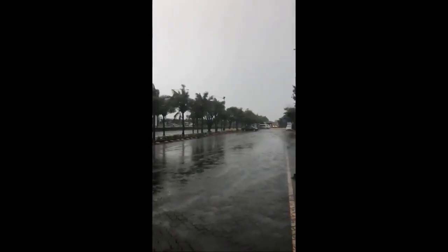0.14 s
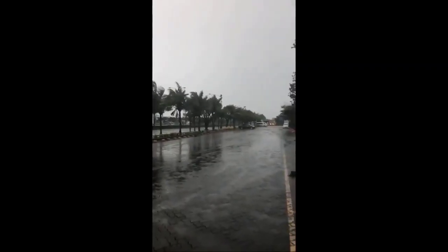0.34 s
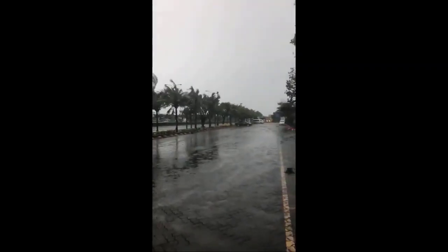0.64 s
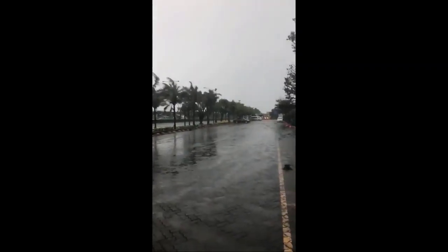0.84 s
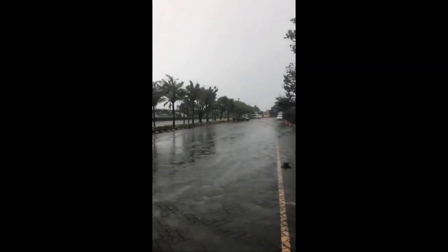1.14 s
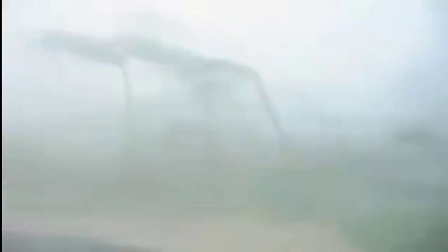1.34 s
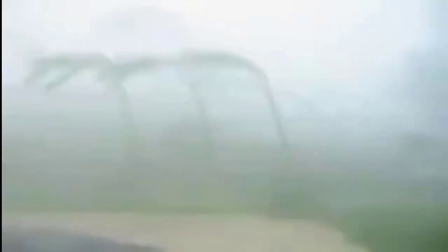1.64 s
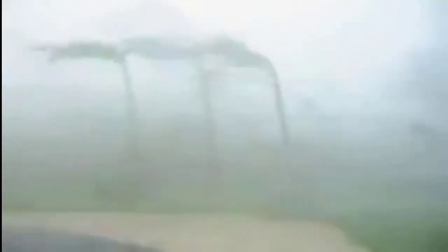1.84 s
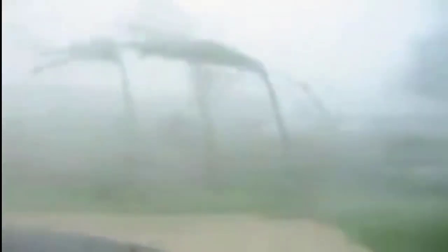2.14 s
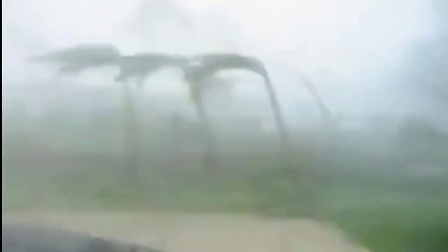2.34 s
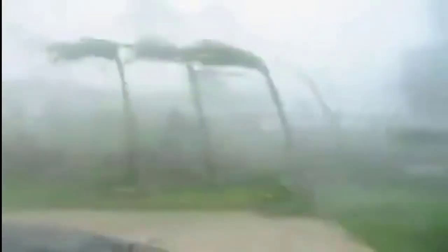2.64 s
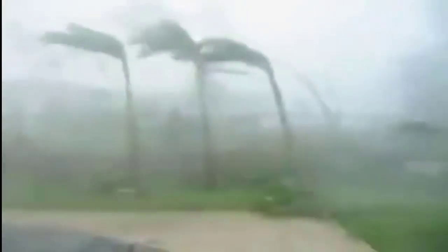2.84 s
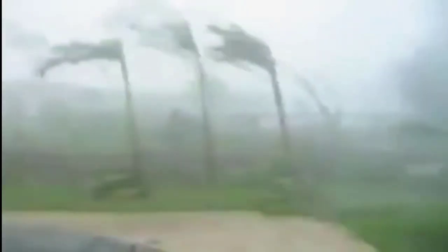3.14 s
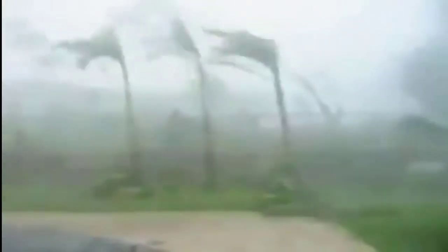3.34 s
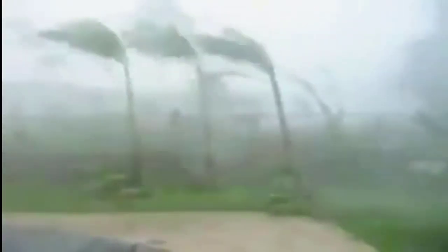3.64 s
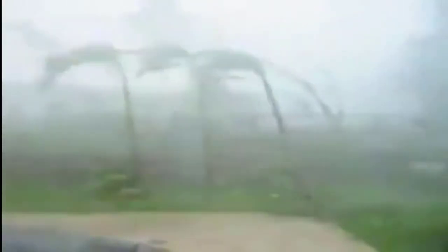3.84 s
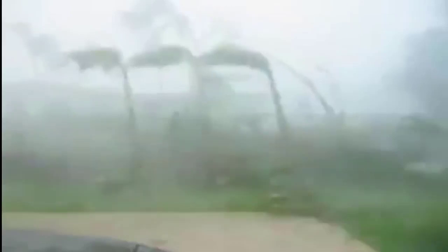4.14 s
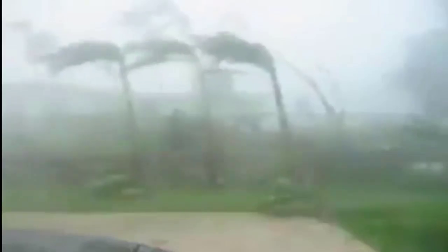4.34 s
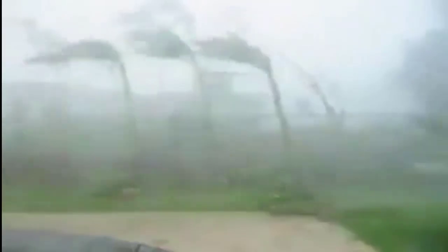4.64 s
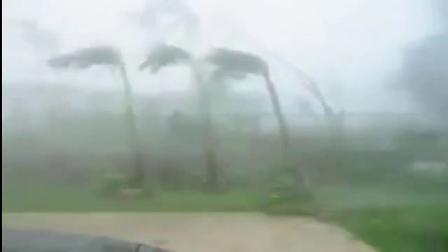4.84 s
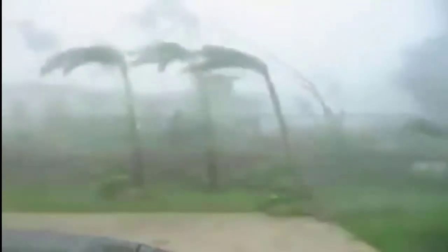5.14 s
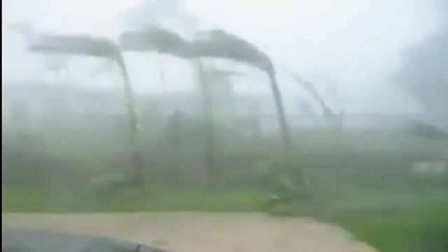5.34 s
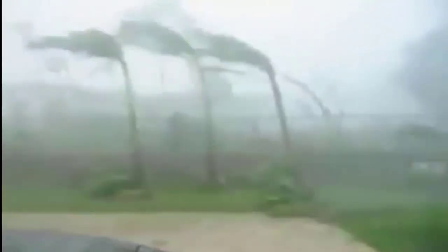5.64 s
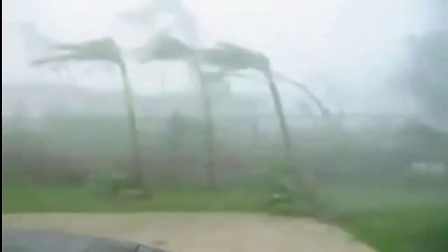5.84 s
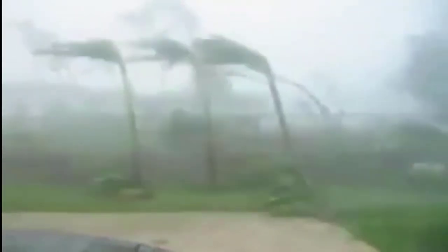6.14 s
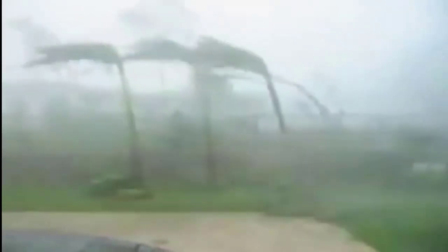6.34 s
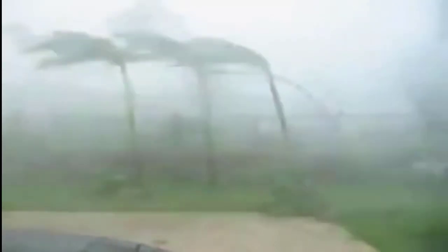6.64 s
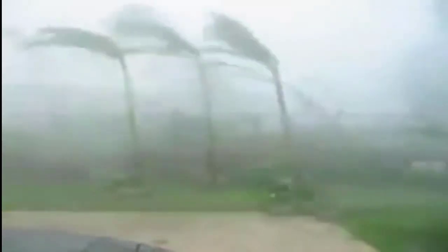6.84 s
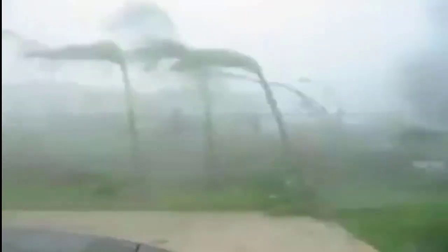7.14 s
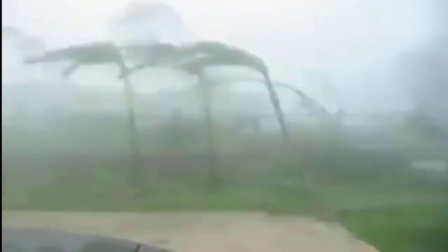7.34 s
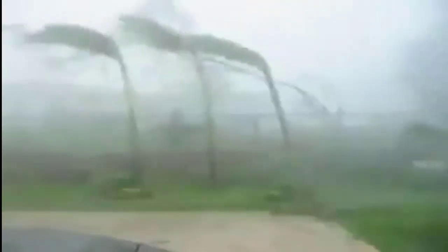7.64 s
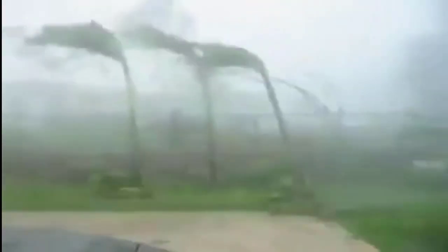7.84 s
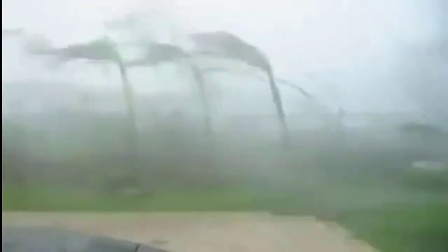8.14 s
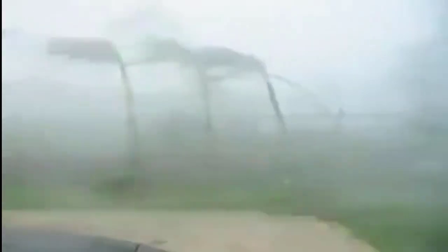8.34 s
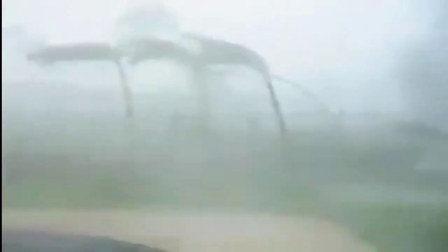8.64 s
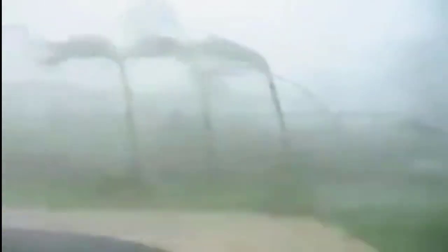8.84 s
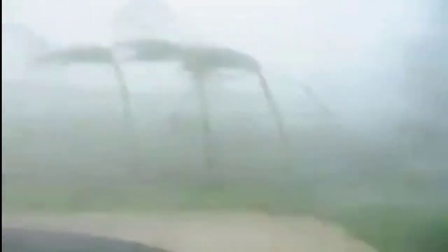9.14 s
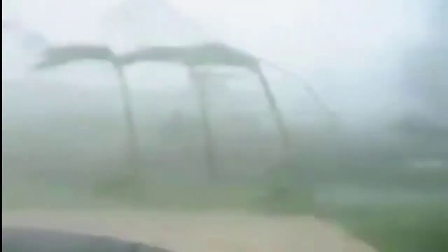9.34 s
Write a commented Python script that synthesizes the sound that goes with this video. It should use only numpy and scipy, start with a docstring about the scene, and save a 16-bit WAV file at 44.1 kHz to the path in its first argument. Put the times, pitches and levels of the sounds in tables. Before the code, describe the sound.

First come close, lumpy wind bursts and low thumps on an unprotected microphone outdoors, with smooth road-water hiss rising underneath. A hard cut brings a much fuller storm heard inside a shaking shelter: continuous deep rumble, fluttering wind roar, a breathy low moan mostly early on, and dense rain drumming and hissing in quick surges to the end. The sound is dull on top, compressed and faintly fizzy.

```python
"""A typhoon heard from two places. First a wet roadside: gusts buffet and pop on a bare microphone, which is
noise shaped into bursts, with low sagging thuds, over a hiss of filtered noise that draws near.
Then, at a stroke, the inside of a sheltered cabin: resonant noise booms, slow noise sways, wind roars in
shaped noise and moans in wavering tones, and flickering noise lashes the walls as sheets of rain.
There an overdriven narrow-band microphone with a steady offset fizzes faintly and is held down by a limiter."""
import sys
import numpy as np
from scipy import signal
from scipy.fft import rfft, irfft
from scipy.io import wavfile
from scipy.ndimage import uniform_filter1d, minimum_filter1d

SR = 44100
rng = np.random.default_rng(int(sys.argv[2]) if len(sys.argv) > 2 else 0)


def dump(signal):
    """Clip the signal to [-1, 1] and save it as 16-bit WAV at the path in sys.argv[1]."""
    limited = np.clip(np.atleast_2d(signal).T, -1, 1)
    pcm = np.round(limited * 32767).astype(np.int16)
    wavfile.write(sys.argv[1], SR, pcm)


N = 418950
TIME_S = np.arange(N) / SR


def amp(db):
    """Decibels to a plain factor."""
    return 10 ** (np.asarray(db) / 20)


def rms_one(x):
    """Scales a signal to an rms of 1."""
    return x / np.sqrt(np.mean(x ** 2) + 1e-20)


def filtered(x, order, hz, kind):
    """Lets through only what is above, or between, the given frequencies."""
    return signal.sosfilt(signal.butter(order, hz, kind, fs=SR, output="sos"), x)


def in_time(rows):
    """Straight lines between the rows of a time table: one curve a column, one value a sample."""
    seconds, *columns = np.transpose(rows)
    return [np.interp(TIME_S, seconds, column) for column in columns]


def drift(rate):
    """Slow chance of spread 1 that changes about rate times a second."""
    # smoothed noise is made at a twentieth of the sample rate; its first part, still settling, is dropped
    r = np.exp(-40 * np.pi * rate / SR)
    noise = rng.standard_normal(N // 20 + 4002)
    slow = signal.lfilter([1], [1, -2 * r, r * r], noise)[4000:]
    return np.interp(np.arange(N) / 20, np.arange(len(slow)), rms_one(slow))


def coloured(x, colour):
    """Shapes a signal by a (f/Hz, level/dB per Hz) table, steeply closed outside it; rms 1."""
    hz, db = np.transpose(colour)
    grid = np.maximum(np.fft.rfftfreq(N, 1 / SR), 1)
    octaves_outside = np.log2(np.maximum(grid / hz[-1], 1) * np.maximum(hz[0] / grid, 1))
    gain_db = np.interp(np.log(grid), np.log(hz), db) - 30 * octaves_outside
    return rms_one(irfft(rfft(x) * amp(gain_db), N))


def patchy(together, own_db, rate):
    """White noise whose octave bands share one flicker (dB) and add one of their own."""
    out, edges = 0, 20 * 2 ** np.arange(11)
    spectrum, grid = rfft(rng.standard_normal(N)), np.fft.rfftfreq(N, 1 / SR)
    for low, high in zip(edges, edges[1:]):
        octave = irfft(spectrum * ((grid >= low) & (grid < high)), N)
        out = out + amp(together + own_db * drift(rate)) * octave
    return out


def resonant_noise(hz, width_hz):
    """Noise rings twice through one resonance; rms 1."""
    r = np.exp(-np.pi * width_hz / SR)
    stage = [1, 0, -1, 1, -2 * r * np.cos(2 * np.pi * hz / SR), r * r]
    # the first second, while the ringing builds up, is dropped
    return rms_one(signal.sosfilt([stage, stage], rng.standard_normal(N + SR))[SR:])


def evened(x, evenness):
    """A steadily driven sound swells less than free noise; rms 1."""
    envelope = np.abs(signal.hilbert(x))
    return rms_one(x / (envelope + 0.051) ** evenness)


def swell(peak_s, length, lean=0):
    """A bell-shaped rise and fall of height 1, one value a millisecond; length (s) is its width at half height."""
    t = np.arange(N * 1000 // SR + 1) / 1000 - peak_s
    side_length = max(length, .01) * (1 - np.clip(lean, -.8, .8) * np.sign(t))
    return 2.0 ** -(2 * t / side_length) ** 2


def to_samples(per_ms):
    """One value a millisecond to one a sample."""
    return np.interp(TIME_S * 1000, np.arange(len(per_ms)), per_ms)


def swells_db(rows, lean=0, axis=1):
    """Decibels gained over time from (peak t/s, level/dB, length/s) rows; axis picks another dB column."""
    return to_samples(sum(row[axis] * swell(row[0], row[2], lean) for row in rows))


# Roadside hiss over time: (t/s, level/dB, further level/dB above 4 kHz)
HISS_LEVELS = [(0.0, -58, 0), (0.12, -56, -8), (0.24, -54.5, 0), (0.36, -55.5, -5), (0.48, -54.5, -4),
               (0.75, -51.5, -1.5), (1.052, -48.5, -4), (1.39, -47, -3)]
# Tone of the wet road: (f/Hz, level/dB per Hz)
HISS_COLOUR = [(400, -15.5), (700, -5.5), (1000, -6.5), (1400, -3.5), (1800, -6), (2400, -17),
               (3500, -25.5), (4300, -32.5), (5600, -32), (7800, -41), (9400, -39), (11800, -43),
               (13500, -43), (15000, -45)]


def wet_hiss():
    """Water on the road makes a smooth far hiss that grows as it nears, while its treble wavers."""
    level_db, treble_db = in_time(HISS_LEVELS)
    hiss = coloured(patchy(0.34 * drift(5.6), 0.28, 19), HISS_COLOUR)
    treble = filtered(hiss, 3, 4000, "high")
    return amp(level_db) * (hiss + (amp(treble_db) - 1) * treble)


# Low thuds of air on the microphone port: (middle t/s, peak level/dB, middle f/Hz, length/s)
THUD_TABLE = [(0.169, -39, 264, 0.01), (0.187, -24, 247, 0.01), (0.219, -34, 149, 0.011),
              (0.571, -25, 186, 0.011), (0.586, -17, 139, 0.0097), (0.657, -40, 165, 0.018),
              (0.826, -31, 140, 0.011), (0.845, -35, 135, 0.018), (0.886, -30.5, 167, 0.028),
              (0.959, -37, 79.5, 0.023), (0.02, -31, 130, 0.01), (1.109, -29, 229, 0.011),
              (1.134, -34, 110, 0.03), (1.153, -30.5, 100, 0.0085), (1.21, -33, 227, 0.0097),
              (1.236, -34, 160, 0.011), (1.253, -29, 150, 0.0075), (1.267, -27, 95, 0.012)]
THUD_SAG = 0.32   # share of its middle pitch that a thud loses over its length


def thuds():
    """Air thumps the port: each thud is a brief low swing that sags in pitch."""
    out = np.zeros(N)
    starts = rng.uniform(0, 2 * np.pi, len(THUD_TABLE))
    for (s, db, hz, length), start in zip(THUD_TABLE, starts):
        near = np.arange(max(round((s - .05) * SR), 0), round((s + .05) * SR))
        t = near / SR - s
        turns = hz * t * (1 - .5 * THUD_SAG * t / length)
        out[near] += amp(db) * 2.0 ** -(2 * t / length) ** 2 * np.sin(start + 2 * np.pi * turns)
    return out


# Eddies popping on the port: (start t/s, burst peak level/dB, top f/Hz of the burst, crack level/dB beside it)
POP_TABLE = [(0.008, -35, 1530, -20), (0.022, -34, 1300, -27), (0.042, -32, 1610, -21),
             (0.055, -29, 1600, -32), (0.065, -29, 1400, -31), (0.09, -45, 1500, -28),
             (0.109, -41, 1200, -30), (0.130, -32, 1090, -28), (0.159, -26.5, 1690, -32),
             (0.163, -24.5, 1070, -29), (0.1835, -13.5, 1740, -29.5), (0.187, -19, 1210, -28),
             (0.199, -44, 1200, -34), (0.211, -34, 1200, -30), (0.353, -40, 1000, -34),
             (0.412, -45, 1800, -22), (0.500, -42, 1800, -18), (0.529, -49, 900, -30),
             (0.567, -29, 990, -29), (0.580, -34, 1200, -28), (0.597, -35.5, 1100, -33),
             (0.627, -38, 1800, -21), (0.816, -37, 1000, -34), (0.872, -39, 800, -32),
             (1.056, -44, 1800, -15), (1.205, -41, 900, -34)]
POP_S, POP_SNAP = 0.0054, 2.9   # fade time; how far the first push stands above the rest
CRACK_LOW_HZ, CRACK_HIGH_HZ = 4200, 7950
CRACK_RISE_S, CRACK_S = 0.0012, 0.0061   # the crack swells later than the burst
OVERTONE_DB, OVERTONE_LOW_HZ, OVERTONE_HIGH_HZ = 7, 2420, 3200   # a narrow band of the crack


def pops():
    """An eddy bursts on the port: a short burst of dull noise with a faint crack on it."""
    out, t = np.zeros(N), np.arange(SR // 20) / SR
    fade = np.minimum(t / 0.00076, 1) * np.exp(-(t / POP_S) ** 2 * 2)
    first_push = 1 + POP_SNAP * np.exp(-(t / 0.0009 - 1) ** 2 * 4)
    crack_fade = np.minimum(t / CRACK_RISE_S, 1) * np.exp(-(t / CRACK_S) ** 2 * 2)
    noises = rng.standard_normal((len(POP_TABLE), len(t)))
    for (s, db, top_hz, crack_db), noise in zip(POP_TABLE, noises):
        dull = signal.cheby1(5, .5, [380, top_hz], "band", fs=SR, output="sos")
        burst = signal.sosfilt(dull, first_push * fade * np.sign(noise))
        overtone = filtered(noise, 2, [OVERTONE_LOW_HZ, OVERTONE_HIGH_HZ], "band")
        crack = filtered(noise, 1, [CRACK_LOW_HZ, CRACK_HIGH_HZ], "band") + amp(OVERTONE_DB) * overtone
        pop = burst / np.abs(burst).max() + amp(crack_db) * crack_fade * crack
        out[round(s * SR):][:len(t)] += amp(db) * pop
    return out


# Gusts on the port: (middle t/s, length/s, body level/dB, sharp edges level/dB)
GUST_TABLE = [(-0, 0.043, -29, -31), (0.041, 0.017, -40, -33), (0.07, 0.029, -29.5, -32.5),
              (0.089, 0.019, -36, -42), (0.127, 0.031, -28, -37.5), (0.166, 0.014, -24, -36),
              (0.191, 0.013, -33, -33), (0.213, 0.023, -27.5, -34.5), (0.258, 0.039, -35, -45),
              (0.315, 0.03, -41, -54), (0.361, 0.032, -37.5, -47), (0.43, 0.08, -45, -61),
              (0.508, 0.027, -49, -62), (0.541, 0.047, -39, -50), (0.587, 0.043, -31.5, -43.5),
              (0.653, 0.046, -37, -61), (0.7, 0.04, -46, -61), (0.762, 0.059, -37, -54),
              (0.835, 0.043, -33.5, -58), (0.891, 0.033, -42, -41.5), (0.934, 0.027, -42, -47),
              (1.024, 0.05, -45, -53), (1.073, 0.04, -40.5, -45), (1.137, 0.037, -40, -49),
              (1.235, 0.026, -42, -46), (1.293, 0.051, -46, -51), (1.345, 0.042, -42, -59),
              (1.397, 0.043, -46, -51)]
# Tone of the dull body: (f/Hz, level/dB per Hz)
BODY_COLOUR = [(30, -2), (55, 3.5), (120, 0), (200, -4), (270, -5.5), (340, -16), (600, -35)]
# Tone of the sharp edges: (f/Hz, level/dB per Hz)
SHARP_COLOUR = [(150, -13), (350, 1), (600, -4.5), (1000, -18), (1600, -27), (2500, -58)]
# Tone of the thin treble riding on the edges: (f/Hz, level/dB per Hz)
GUST_TREBLE_COLOUR = [(2500, -1), (4500, 3), (7500, -8), (12000, -8), (15000, -9)]
GUST_TREBLE_DB = -34   # beside the edges
LULL_DB, LULL_EDGES_DB = -50, -73   # body and edges between the gusts
GUST_LEAN = -0.3   # a gust strikes at once and trails off
BUFFET_EVENNESS = 0.1


def gust_gain(column, lull_db):
    """Adds up the gusts over a quiet floor, from one level column of the gust table."""
    gain = amp(lull_db)
    for row in GUST_TABLE:
        middle_s, length = row[:2]
        peak_s = middle_s + GUST_LEAN * length / 2
        gain = gain + amp(row[column]) * swell(peak_s, length, GUST_LEAN)
    return to_samples(gain)


def buffeting():
    """Eddies hit the port in lumps; their sharp edges come as separate grains within the lumps."""
    lumps = drift(59)
    body = evened(coloured(patchy(1.5 * lumps, 0.77, 8.9), BODY_COLOUR), BUFFET_EVENNESS)
    body = filtered(body, 3, [45, 330], "band")   # the port passes little above or below
    edges = coloured(patchy(2.0 * lumps + 2.4 * drift(84), 0.51, 40), SHARP_COLOUR)
    treble = coloured(patchy(2.0 * lumps, 1.5, 60), GUST_TREBLE_COLOUR)
    edges = edges + amp(GUST_TREBLE_DB) * treble
    return gust_gain(2, LULL_DB) * body + gust_gain(3, LULL_EDGES_DB) * edges


# Tone of the slow pressure swings in the cabin: (f/Hz, level/dB per Hz)
SWAY_TONE = [(1, 8), (4, -20), (10, 18), (17, 0), (24, 0), (32, 5)]


def sway():
    """The cabin air sways in slow pressure swings, mostly too low to hear."""
    return amp(-30) * coloured(rng.standard_normal(N), SWAY_TONE)


# Notes of the moan: (middle t/s, level/dB, length/s, f/Hz)
MOAN_NOTES = [(2.117, -52, 0.092, 232.4), (2.27, -45.5, 0.25, 250), (2.2, -50, 0.08, 312),
              (2.365, -41, 0.081, 305), (2.516, -38.5, 0.074, 281), (2.672, -46, 0.21, 283.5),
              (2.844, -37.5, 0.11, 282), (3, -37, 0.11, 281), (3.137, -39.5, 0.054, 293),
              (3.204, -42.5, 0.08, 303), (3.327, -48, 0.12, 278), (3.568, -43, 0.11, 290),
              (4.615, -40, 0.087, 284), (5.799, -53.5, 0.67, 283), (6.75, -44.5, 0.21, 320)]
MOAN_WANDER_HZ, MOAN_BREATH = 5.5, 0.22   # spread of the pitch; share of breathy noise
PANEL_HZ, PANEL_WIDTH_HZ, PANEL_DB = 250, 19, -53.5   # a panel that keeps humming


def moan():
    """Wind over gaps sings unsteady, breathy notes that may overlap; a panel hums below them."""
    wander = 2 * np.pi * np.cumsum(MOAN_WANDER_HZ * drift(19.5)) / SR
    breath = 1 + MOAN_BREATH * (drift(32) + 1j * drift(30))
    breath = np.sqrt(2) * amp(2.0 * drift(29.0)) * breath   # the root turns rms levels into peaks
    out = amp(PANEL_DB) * resonant_noise(PANEL_HZ, PANEL_WIDTH_HZ)
    for s, db, length, hz in MOAN_NOTES:
        near = slice(int((s - 1.5 * length) * SR), int((s + 1.5 * length) * SR))
        t = TIME_S[near]
        note = np.real(breath[near] * np.exp(1j * (2 * np.pi * hz * t + wander[near])))
        out[near] += amp(db) * 2.0 ** -(2 * (t - s) / length) ** 2 * note
    return out


# Boom and roar over time: (t/s, boom level/dB, roar level/dB)
STORM_LEVELS = [(1.42, -26, -37), (1.47, -35, -39), (1.55, -27, -37.5), (1.85, -29, -37),
                (2.05, -23.5, -43.5), (2.3, -29.5, -36.5), (2.45, -25, -40.5), (2.85, -29.5, -37),
                (3.05, -24.5, -39.5), (3.18, -28, -37.5), (3.75, -30.5, -38), (4.3, -27.5, -35.5),
                (4.47, -31, -39.5), (4.65, -29, -40.5), (5.25, -24.5, -36), (5.43, -34, -37.5),
                (5.58, -26.5, -39), (5.72, -31, -42.5), (5.9, -26.5, -37), (6.65, -28.5, -40),
                (7.1, -24.5, -38), (7.5, -27, -42), (7.8, -29.5, -36), (7.9, -29.5, -40),
                (8.15, -25, -37.5), (8.55, -31.5, -40.5), (8.7, -26.5, -38.5), (8.9, -26, -43.5),
                (9.2, -31.5, -35), (9.4, -24.5, -38.5), (9.5, -28.5, -40)]
BOOM_HZ, BOOM_WIDTH_HZ, BOOM_EVENNESS = 38.8, 26.6, 0.57
CORE_HZ, CORE_WIDTH_HZ, CORE_DB = 42, 6.6, -2.7   # the sharper heart of the boom, level beside the rest


def boom(eddies):
    """Gusts shake the cabin, and its air booms at a low resonance."""
    boom_db = in_time(STORM_LEVELS)[0]
    core = amp(CORE_DB) * resonant_noise(CORE_HZ, CORE_WIDTH_HZ)
    air = evened(resonant_noise(BOOM_HZ, BOOM_WIDTH_HZ) + core, BOOM_EVENNESS)
    return amp(boom_db + 0.68 * drift(7.1) + 0.85 * eddies) * air


# Surges of the roar: (peak t/s, gained level/dB, length/s)
ROAR_SURGES = [(1.758, 1.5, 0.072), (2.362, 3, 0.097), (3.281, 0, 0.13), (5.171, 1.5, 0.11),
               (5.763, 7.5, 0.27), (6.869, 5.5, 0.07), (7.073, 5, 0.066), (7.38, 8.5, 0.097),
               (7.704, -0.5, 0.083), (8.382, 4, 0.061), (8.54, 6.5, 0.045), (8.834, 4, 0.089),
               (9.046, 5, 0.058)]
# Tone of the roar: (f/Hz, level/dB per Hz)
ROAR_TONE = [(18, -33), (60, -4.5), (72, -6), (83, -0.5), (95, -7.5), (104, -5.5), (118, -4.5), (150, -1),
             (180, -4), (230, -10.5), (300, -9), (420, -17.5), (800, -20), (1500, -37)]
# The roar's lowest part over time: (t/s, level/dB added below LOW_ROAR_HZ)
LOW_ROAR_LEVELS = [(1.42, 0.5), (1.9, -2.5), (2.3, 5), (2.8, -2), (3.3, 1.5), (3.8, 2.5), (4.3, 4),
                   (4.7, 5.5), (5.1, 0), (5.6, -1.5), (6.1, 0), (6.6, -1), (7.1, -1), (7.6, 1), (8.2, 1.5),
                   (8.7, -3), (9.1, 6), (9.5, -2.5)]
LOW_ROAR_HZ = 129
ROAR_FOLLOWS = 0.42   # dB of roar gained per dB of rain


def roar(more_rain_db, eddies):
    """Turbulent wind roars as flickering low noise that grows with the rain."""
    roar_db = in_time(STORM_LEVELS)[1] + ROAR_FOLLOWS * more_rain_db + swells_db(ROAR_SURGES)
    wind = amp(roar_db) * coloured(patchy(1.02 * drift(27) + 1.26 * eddies, 0.5, 6.8), ROAR_TONE)
    low = signal.sosfiltfilt(signal.butter(2, LOW_ROAR_HZ, fs=SR, output="sos"), wind)
    return wind + (amp(in_time(LOW_ROAR_LEVELS)[0]) - 1) * low


# Rain between the lashes: (t/s, hiss level/dB, level/dB added to the drumming, level/dB added to the top octave)
RAIN_LEVELS = [(1.42, -47.5, -2.5, -1.5), (2.25, -50.5, 1.5, -4.5), (3.22, -46, 0.5, 0.5),
               (3.58, -44.5, 1.5, 0.5), (4.01, -48, -2.5, 1), (4.28, -48, 1.5, 0.5), (4.61, -45, 2, 1.5),
               (5.51, -40.5, 1.5, 1), (5.74, -49.5, 1, -0.5), (5.96, -44, -2.5, 1), (6.19, -39, 2, 2),
               (6.48, -45.5, -1.5, 2.5), (6.82, -43.5, 4.5, 2), (7.04, -47.5, -1, -1),
               (7.27, -49.5, 0.5, -4.5), (7.79, -48, 1.5, 2.5), (8.28, -40.5, -0.5, 1), (8.42, -43, -1, 3),
               (9.27, -44, 1.5, 1), (9.5, -42.5, -3, 0)]
# Brief lulls of the rain: (peak t/s, gained level/dB, length/s)
RAIN_LULLS = [(1.624, -5.5, 0.049), (2.032, -1.5, 0.075), (2.588, -2.5, 0.028), (3.127, -4, 0.14),
              (3.833, -6, 0.043), (4.204, -2, 0.067), (4.581, -4, 0.035), (5.115, -2, 0.33),
              (6.193, -6.5, 0.064), (6.47, -1, 0.027), (6.616, -3.5, 0.021), (7.161, -3.5, 0.059),
              (8.192, -7, 0.1), (8.48, -2, 0.03), (8.57, -3, 0.044), (8.799, -5.5, 0.043),
              (9.242, -6.5, 0.038)]
# Sheets of rain lashing the walls: (peak t/s, gained hiss level/dB, length/s, gained drumming level/dB)
RAIN_LASHES = [(1.45,6,0.035,11.5), (1.665,4.5,0.041,5), (1.751,2,0.039,3.5), (1.842,-4,0.021,-6),
               (1.919,6,0.031,9), (2.334,5,0.31,4.5), (2.524,5.5,0.052,2.5), (2.835,4,0.055,3),
               (2.946,1.5,0.019,3), (3.21,2,0.022,9), (3.275,-5,0.033,2), (3.47,1.5,0.02,3),
               (3.741,3,0.11,2.5), (3.932,1,0.15,4), (4.106,1.5,0.031,9), (4.487,8,0.062,3.5),
               (4.794,2,0.068,4), (4.918,1.5,0.051,6), (5.24,2,0.041,5), (5.358,2,0.036,2),
               (5.476,1,0.074,3), (5.735,4,0.047,7), (6.12,1.5,0.033,3), (6.42,5,0.065,5.5),
               (6.756,7,0.054,4), (6.866,3.5,0.078,-3.5), (6.93,-1.5,0.04,-2.5), (6.984,3,0.039,4),
               (7.509,6,0.044,7), (7.604,5,0.018,4), (7.81,5.5,0.21,2), (8.36,2.5,0.033,3),
               (8.428,7,0.078,4), (8.53,3,0.048,0.5), (8.863,6,0.1,3), (8.98,4.5,0.047,4.5),
               (9.379,4,0.045,3), (9.453,3,0.028,2)]
LASH_LEAN = 0.17   # a lash builds slowly and stops short: share of its length moved from the fall to the rise
MIDDLING_RAIN_DB = -47.5
DRUM_FOLLOWS = 0.67   # dB of drumming gained per dB of rain, before the lashes


def rain_levels():
    """Wind drives the rain in sheets: how far it is above middling rain, and what drumming and top gain (dB)."""
    rain_db, drum_db, top_db = in_time(RAIN_LEVELS)
    more_db = rain_db + swells_db(RAIN_LULLS) - MIDDLING_RAIN_DB
    drum_db = drum_db + DRUM_FOLLOWS * more_db + swells_db(RAIN_LASHES, LASH_LEAN, axis=3)
    return more_db + swells_db(RAIN_LASHES, LASH_LEAN), drum_db, top_db


# Tone of the rain's hiss: (f/Hz, level/dB per Hz)
RAIN_TONE = [(600, -19), (1100, -9.5), (1500, 1.5), (2150, 2.5), (2700, -3), (3190, -4.5), (3600, -11)]
# Tone of the drumming walls: (f/Hz, level/dB per Hz)
DRUM_TONE = [(300, -4), (450, -4.5), (750, -1.5), (1000, -5.5), (1300, -8)]
# Tone of the top octave of the rain: (f/Hz, level/dB per Hz)
TOP_TONE = [(2600, -7.5), (3300, -6), (3800, 1), (4300, 1), (5300, -5.5)]
DRUM_DB = -45   # at middling rain
TOP_DB, TOP_FOLLOWS = -60.5, 0.87   # base level, and dB gained per dB of rain
TOP_BITE = 0.15   # further dB of top octave per dB of rain, from 6.5 dB below middling upwards


def rain_drops():
    """About 9000 drops a second, each a one-sample jump in loudness of chance size."""
    sizes = amp(2.0 * np.minimum(rng.exponential(1, N), 5))
    return 1 + 0.12 * sizes * (rng.random(N) < 9000 / SR)


def rain_sheets(more_db, drum_db, top_db, eddies):
    """Dense drops flutter with the gusts: they drum on the walls and hiss; gives the rain and its bare spray."""
    flutter = 0.19 * drift(3.8) + 0.91 * eddies
    drops = rain_drops()
    spray = patchy(flutter, 0.3, 23) * drops
    mist = patchy(flutter + 0.29 * drift(25.0), 1.1, 24) * drops
    hiss = amp(MIDDLING_RAIN_DB + more_db) * coloured(spray, RAIN_TONE)
    drum = amp(DRUM_DB + drum_db) * coloured(mist, DRUM_TONE)
    top_db = TOP_DB + top_db + TOP_FOLLOWS * more_db + TOP_BITE * np.maximum(more_db + 6.5, 0)
    top = amp(top_db) * coloured(mist, TOP_TONE)
    return hiss + drum + top, spray


# Tone of the distorted fizz above the microphone's band: (f/Hz, level/dB per Hz)
FIZZ_TONE = [(4500, 2), (7000, -2), (10000, -4.5), (13000, -7.5), (15500, -13)]
FIZZ_DB, FIZZ_FOLLOWS = -66.5, 0.64   # level at middling rain, and dB gained per dB of rain


def microphone_fizz(spray, more_rain_db):
    """The overdriven microphone adds a faint distorted fizz above the band, which follows the rain's level."""
    return amp(FIZZ_DB + FIZZ_FOLLOWS * more_rain_db) * coloured(spray, FIZZ_TONE)


CEILING, KNEE = .132, 4   # a higher knee bends more sharply at the ceiling
LIMITER_S, DRIVE_DB = 0.0065, 1   # time window; boost ahead of the limiter


def limiter(x):
    """Gain sinks gradually around each peak, so that large swings are squeezed towards the ceiling."""
    span = int(LIMITER_S * SR)
    driven = amp(DRIVE_DB) * x
    peak = -minimum_filter1d(-np.abs(driven), span)
    gain = (1 + (peak / CEILING) ** KNEE) ** (-1 / KNEE)
    return driven * uniform_filter1d(gain, span)


SWITCH_S, SETTLE_S = 1.399, .006   # when the cabin begins; how long its sound takes to open
BAND_EDGE_HZ, OFFSET = 4874, -.135


def cabin():
    """The shaken cabin booms and sways; the microphone passes a narrow band into a limiter."""
    more_rain_db, drum_db, top_db = rain_levels()
    eddies = drift(31)   # one fast flutter shakes boom, roar and rain together
    rain, spray = rain_sheets(more_rain_db, drum_db, top_db, eddies)
    mix = sway() + moan() + boom(eddies) + roar(more_rain_db, eddies) + rain
    band = signal.sosfilt(signal.ellip(7, .5, 40, BAND_EDGE_HZ, fs=SR, output="sos"), mix)
    opened = np.clip((TIME_S - SWITCH_S) / SETTLE_S, 0, 1)   # the sound opens from the bare offset
    return OFFSET + opened * limiter(band + microphone_fizz(spray, more_rain_db))


def scene():
    """The roadside, its lowest bass thinned at the port, then at a stroke the cabin."""
    roadside = wet_hiss() + thuds() + pops() + buffeting()
    roadside = filtered(roadside, 2, 48, "high")
    return np.where(np.arange(N) < SWITCH_S * SR, roadside, cabin())[None]


def record(dry):
    """A steep filter cuts the treble above 15.1 kHz."""
    return signal.sosfilt(signal.ellip(9, .1, 50, 15100, fs=SR, output="sos"), dry)


dry = scene()
out = record(dry)
dump(out)
```